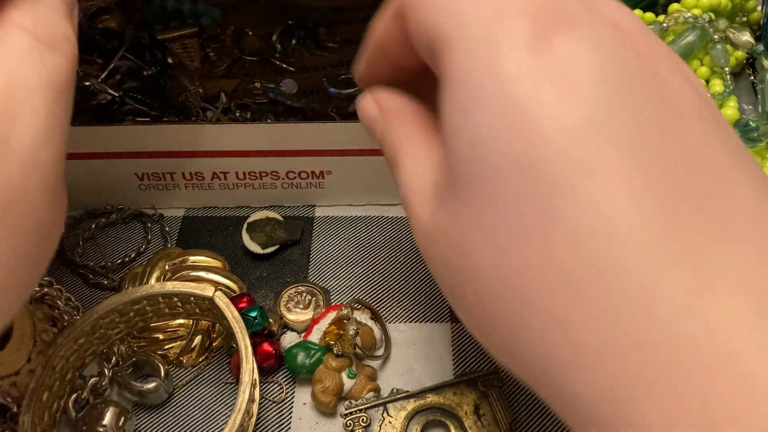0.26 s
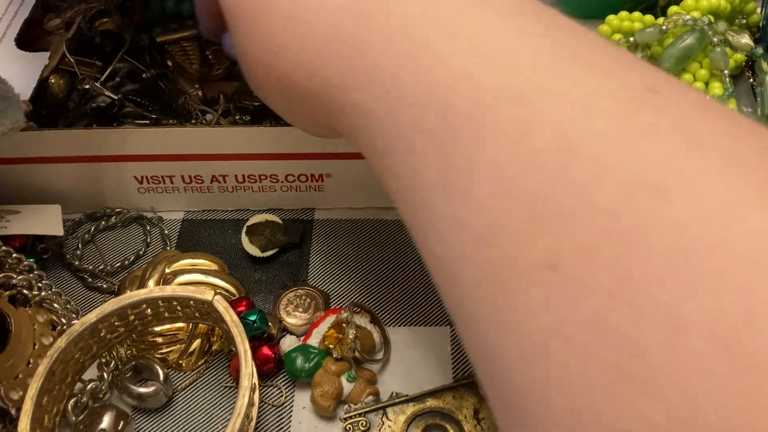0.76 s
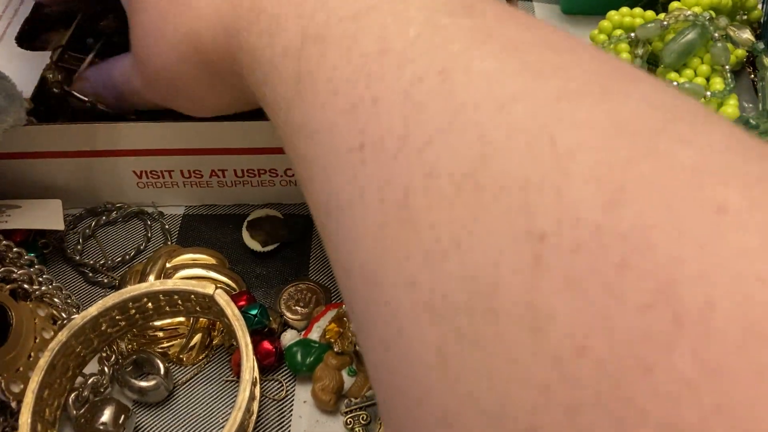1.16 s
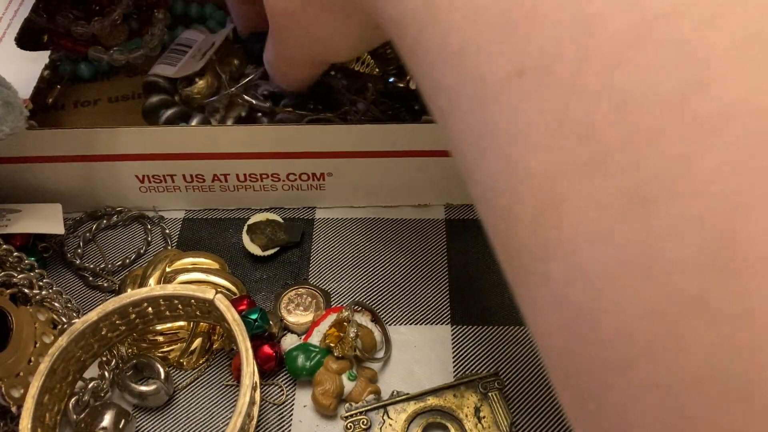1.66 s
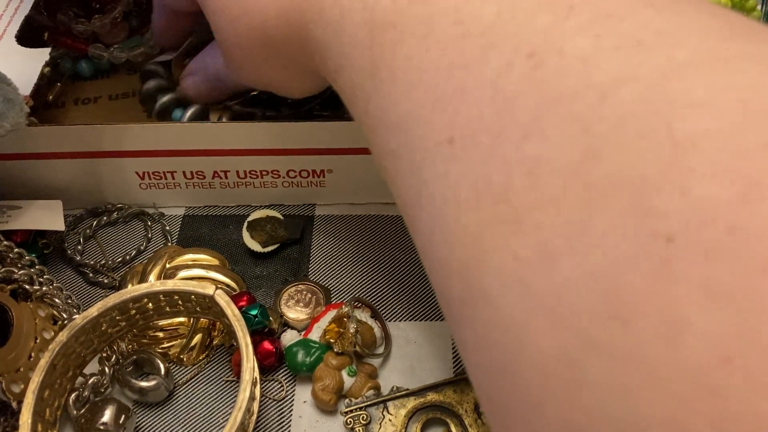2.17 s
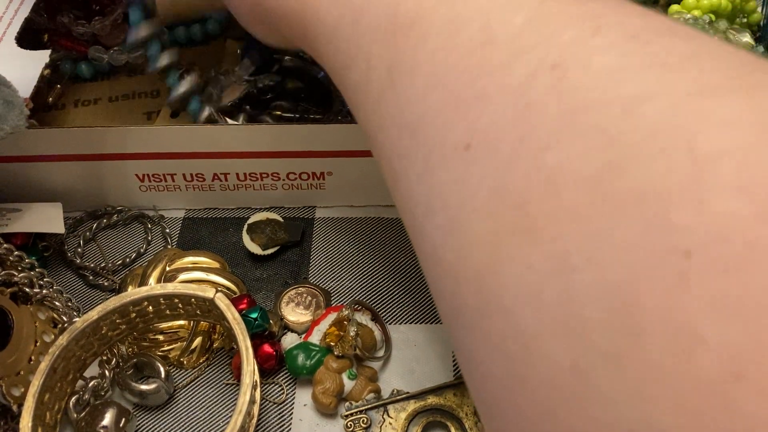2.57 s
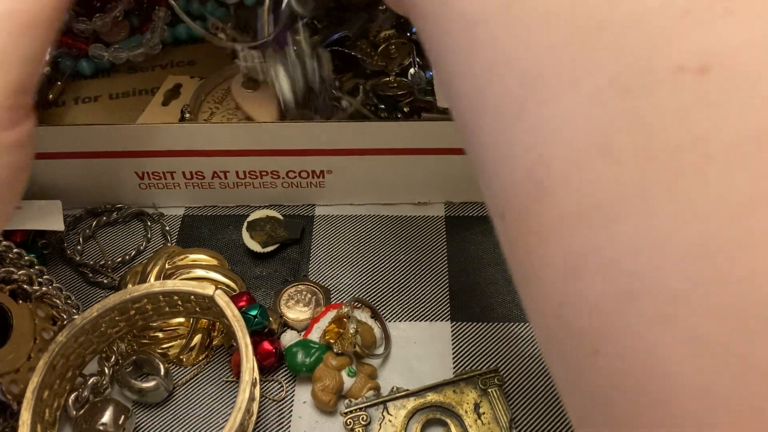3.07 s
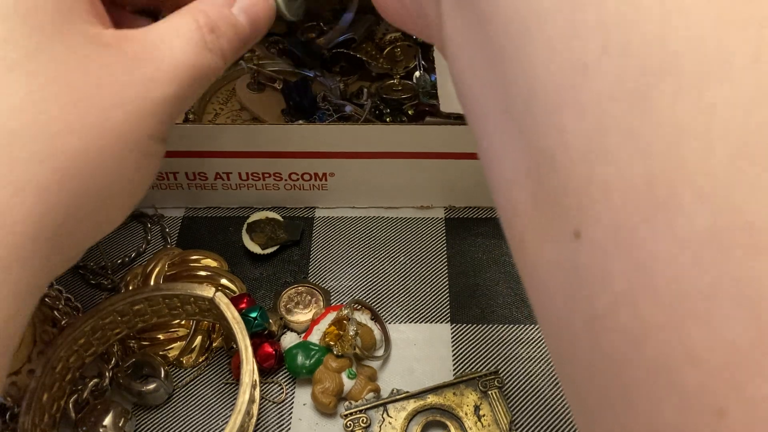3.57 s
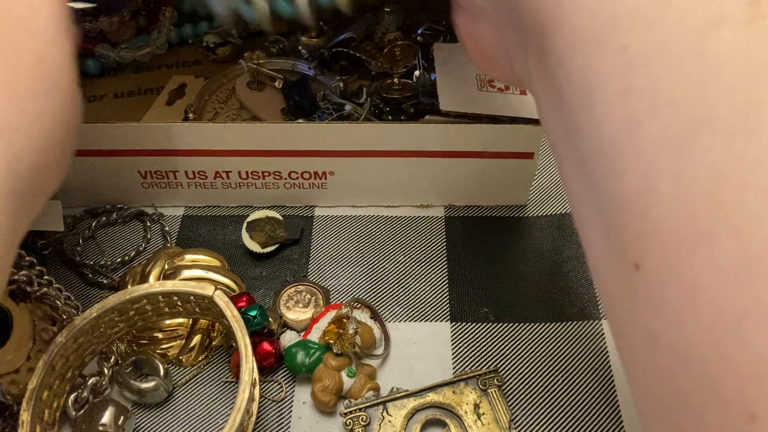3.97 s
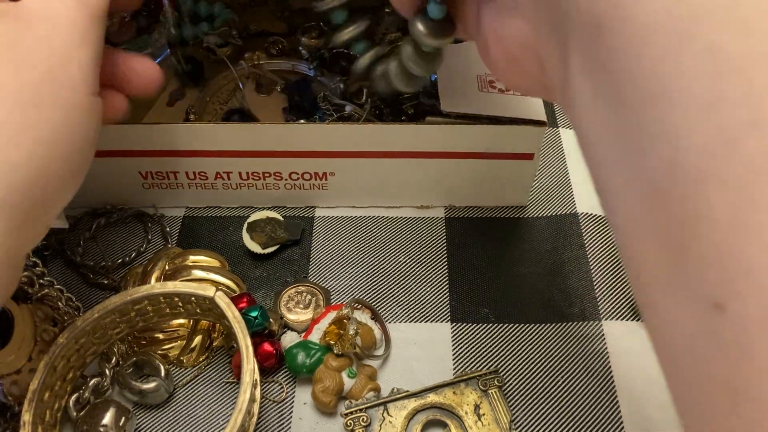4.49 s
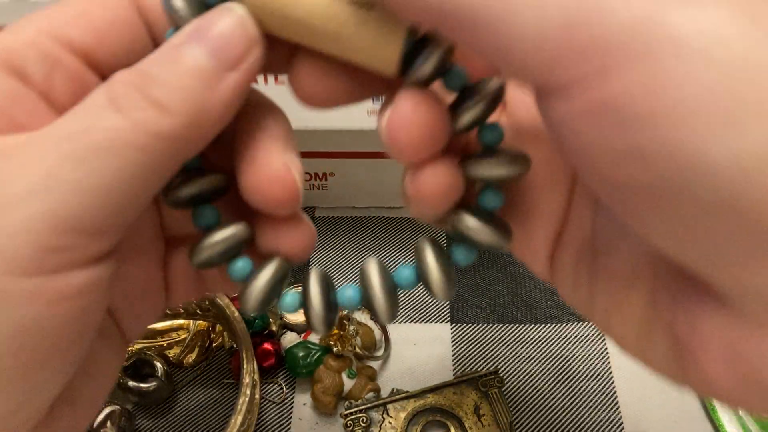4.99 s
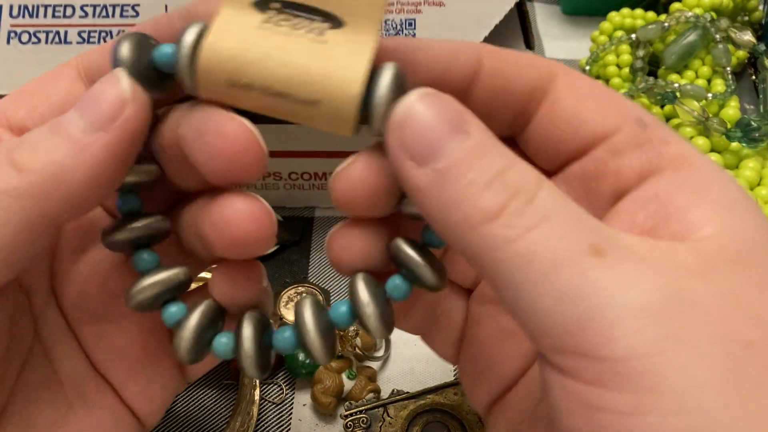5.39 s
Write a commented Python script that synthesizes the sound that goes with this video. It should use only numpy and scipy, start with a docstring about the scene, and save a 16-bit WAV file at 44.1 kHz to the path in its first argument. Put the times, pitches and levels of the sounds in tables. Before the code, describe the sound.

Hands brush a cardboard box, then rummage through a heap of costume jewelry with clinks, rattles and hollow card knocks.

```python
"""Fingers brush the flap of a cardboard box, then hands reach in and rummage through costume jewelry.
Beads and chains slide as patchy noise with tiny rings; clear contacts are noise bursts with a ringing part.
Heavy pieces knock the card walls into damped modes, and an arm thumps the table with a tap and sinking boom.
A faint hum and room air lie underneath; two close microphone ports differ in level and phase by frequency."""
import sys
import numpy as np
from scipy import signal
from scipy.fft import rfft, irfft, next_fast_len
from scipy.io import wavfile
from scipy.ndimage import uniform_filter1d, map_coordinates

SR = 44100
rng = np.random.default_rng(int(sys.argv[2]) if len(sys.argv) > 2 else 0)


def rack_gain(trim_db):
    """Turn a fader trim in dB into the linear factor to multiply a signal by."""
    fader = np.asarray(trim_db, float)
    return 10 ** (fader / 20)


def unload_wav(signal):
    """Save mono or channel-first audio to the path in sys.argv[1] as 16-bit WAV at rate SR, clipped to [-1, 1]."""
    wavfile.write(
        sys.argv[1],
        SR,
        np.round(np.clip(np.atleast_2d(signal).T, -1, 1) * 32767).astype(np.int16),
    )


N = 248812

# stirring of the heap, brighter towards chains and duller towards card:
# (time [s], rustle level [dB], brightness [dB])
STIRRING = [(0.0, -78, 6.5), (0.83, -78.5, -7), (0.869, -39.5, 2.5), (0.911, -53, -1), (1.026, -52.5, -0.5),
            (1.21, -44.5, -4), (1.241, -36.5, -2.5), (1.291, -40.5, 0.5), (1.524, -31.5, -1),
            (1.64, -33, -2.5), (1.701, -37.5, -4), (1.756, -48, -1), (1.796, -41.5, -7), (1.854, -67, 0.5),
            (1.925, -71, -9.5), (2.005, -45, -3), (2.154, -51.5, 3), (2.217, -41.5, -0.5),
            (2.269, -50.5, 3), (2.312, -47, 5), (2.47, -45.5, 5), (2.64, -45, 1), (2.828, -48.5, 5),
            (2.859, -43.5, -0.5), (2.933, -47.5, 4.5), (3.055, -47, 3.5), (3.15, -36, -3),
            (3.259, -55, 3.5), (3.382, -56, 0.5), (3.593, -61.5, -2), (3.648, -50, 9), (3.689, -59.5, 5.5),
            (4.058, -58.5, 4), (4.104, -54, 7), (4.324, -67.5, 4.5), (4.395, -49, 0), (4.424, -44.5, -1),
            (4.495, -49.5, 3.5), (4.531, -41, 1), (4.599, -46, -0.5), (4.805, -55.5, -1),
            (4.855, -62, -1.5), (4.925, -54.5, 0), (4.98, -57, 2.5), (5.032, -66, -12.5),
            (5.116, -64.5, -2.5), (5.268, -73, 3), (5.394, -65.5, 11.5), (5.525, -80.5, 6),
            (5.642, -83, 2.5)]
# fingers on the box flap, swell and fade each spanning 20 dB:
# (peak time [s], level [dB], brightness [dB], swell [s], fade [s])
FLAP_BRUSHES = [(0.0, -40.5, 0, .05, 0.036), (0.159, -55, -1.5, 0.13, 0.031),
                (0.281, -59.5, 3.5, 0.087, 0.2), (0.483, -55, -1.5, 0.095, 0.16),
                (0.741, -56.5, 0, 0.096, 0.069)]
# clearest bead and link contacts, levels ahead of the offsets in clicks():
# (time [s], peak level [dB], treble over peak [dB], ring pitch [Hz], burst t60 [ms])
CONTACTS = [(0.0234, -42, -1.5, 2220, 22), (0.2947, -33.5, -8.5, 2260, 42), (0.8418, -40.5, -10, 2230, 55),
            (0.8634, -34.5, 1, 9330, 41), (0.8947, -35, -1, 3580, 32), (0.9317, -33.5, -1.5, 3450, 20),
            (1.0924, -34, -8.5, 1760, 26), (1.1418, -23.5, -27, 1950, 12), (1.1575, -22, -17.5, 2310, 15),
            (1.2227, -25.5, -26, 1820, 52), (1.2344, -24.5, -3.5, 2070, 62), (1.3275, -25.5, -1, 2700, 26),
            (1.4132, -19.5, -4, 3380, 24), (1.4634, -24, -12, 3920, 31), (1.6926, -21.5, -10, 2090, 15),
            (1.7886, -27.5, -4, 3410, 35), (1.937, -22, -11, 4050, 20.6), (1.9873, -19.5, -12.5, 2400, 14),
            (2.0498, -34.5, 8, 11580, 16), (2.1211, -33, -5, 7680, 23), (2.172, -30, -7.5, 11460, 49),
            (2.213, -32, -1.5, 2630, 84), (2.2935, -25.5, -8.5, 4580, 23), (2.312, -26, -11, 4570, 84),
            (2.3883, -28.5, -9, 2560, 35), (2.4415, -38, -17, 2750, 23), (2.4791, -33, -0.5, 2500, 37),
            (2.5276, -29, -5, 8160, 30), (2.5823, -27, -16, 2710, 22), (2.6328, -30.5, -6, 3440, 56),
            (2.7006, -34, 2, 2900, 12), (2.7258, -27, -27, 4260, 49), (2.7512, -30, -28.5, 4240, 19),
            (2.7718, -36.5, 0.5, 5550, 13), (2.8373, -24.5, -6.5, 3690, 24), (2.8454, -25, -9.5, 7560, 25),
            (2.8614, -24.5, -5, 3540, 22), (2.957, -34, 0, 3650, 32), (3.0049, -33, 7, 10730, 13),
            (3.023, -19, -11, 3610, 15), (3.0649, -25, -4, 4130, 20), (3.1176, -15, -9.5, 2356, 27),
            (3.129, -21.5, -6.5, 2240, 19), (3.1398, -18.5, -12, 1920, 49), (3.1565, -18.5, -5, 1975, 51),
            (3.1955, -26.5, -15, 2400, 55), (3.216, -29.5, -9, 3760, 37), (3.2818, -28, -9, 3400, 67),
            (3.3374, -41, 1.5, 4000, 28), (3.378, -39, -4.5, 6750, 9.3), (3.42, -39.5, -14, 2920, 37),
            (3.4531, -28.5, -23, 1900, 12), (3.4904, -36.5, -12, 6900, 12), (3.529, -42.5, -13, 4460, 33),
            (3.6206, -33.5, -8, 11200, 72), (3.6622, -37, -0.5, 4090, 31), (3.7595, -44.5, 1, 3970, 35),
            (3.8163, -36.5, -1.5, 8370, 29), (3.9231, -35.5, 4.5, 8250, 9.3),
            (3.9537, -28.5, 0.5, 11500, 19), (4.0782, -44, -3, 11400, 28), (4.0945, -38.5, 3.5, 1880, 36),
            (4.1604, -48, 1.5, 11000, 25), (4.205, -35, -10, 1880, 31), (4.356, -26.5, -2.5, 2510, 32),
            (4.38, -21, -9, 2520, 32), (4.406, -28, -16, 3700, 17), (4.4203, -18, -8, 2650, 25),
            (4.4314, -28.5, -7, 4420, 43), (4.4674, -30, -15, 2490, 28), (4.5076, -26.5, -14, 2530, 79),
            (4.5212, -24, -13, 2507, 33), (4.595, -19.5, -7, 3800, 19), (4.6183, -41, -1, 4080, 17),
            (4.6555, -37, -2, 1910, 23), (4.6948, -23.5, -12, 2863, 26), (4.706, -29.5, -11.5, 2920, 28),
            (4.859, -45, -19, 1810, 31), (5.137, -39, -6, 2740, 54), (5.2348, -63, 10.5, 7180, 14),
            (5.2725, -53, -23, 2680, 22), (5.4882, -55, -13, 2710, 19)]
# pieces striking the card, t60 at the wall pitch:
# (time [s], nominal peak level [dB], wall pitch [Hz], upper modes [dB], t60 [ms])
CARD_BLOWS = [(0.26, -20, 497, -19, 12), (0.492, -40.5, 740, 0, 17), (0.856, -34, 920, -14, 24),
              (0.93, -25, 830, -21.5, 15), (0.99, -34.5, 870, -3.5, 17), (1.159, -27, 760, -6, 9.7),
              (1.228, -20.5, 1020, -12.5, 20), (1.233, -31, 745, 16.5, 19), (1.328, -28, 975, 3.5, 16),
              (1.472, -28, 926, 10, 7.8), (1.703, -23.5, 932, -5.5, 8.8), (1.781, -19, 808, -14.5, 12),
              (1.791, -39.5, 950, -12.5, 15), (1.936, -9.5, 887, -10.5, 16), (1.987, -13, 826, -15.5, 13.4),
              (2.203, -43.5, 467, 1, 13), (2.73, -31.5, 870, -16, 21), (2.752, -33, 915, -21, 17),
              (2.838, -27.5, 980, -14.5, 13), (2.86, -28, 895, -7.5, 12), (2.958, -42, 497, 6.5, 27),
              (3.022, -21.5, 816, -31, 19), (3.065, -26.5, 851, -15, 17), (3.089, -22.5, 820, -19, 18),
              (3.118, -24, 785, -10.5, 15), (3.14, -28, 408, 0, 16), (3.163, -24, 770, -1.5, 20),
              (3.215, -22, 894, -8.5, 12), (3.281, -17, 966, -40.5, 13), (3.295, -27.5, 810, -20, 14),
              (3.453, -21.5, 1330, -26, 16), (4.085, -27.5, 764, -13, 40), (4.095, -13.5, 820, -16, 18),
              (4.103, -15.5, 410, -14, 14), (4.203, -19, 832, -10, 17.3), (4.531, -32, 493, -10.5, 16),
              (4.655, -36.5, 490, -6, 19), (4.695, -30.5, 1125, 0, 11), (4.877, -39.5, 760, -15, 18),
              (4.902, -42.5, 920, -10, 18), (5.02, -45, 606, 5.5, 18), (5.065, -41, 915, -11, 35)]
# arm on the table, levels and boom pitch ahead of the factors in thumps():
# (time [s], nominal peak level [dB], tap over boom [dB], tap pitch [Hz], nominal boom pitch [Hz])
TABLE_BLOWS = [(0.255, -21.5, -23, 503, 137), (.492, -42.5, -1, 388, 126), (.722, -46, 0.5, 570, 110),
               (1.222, -34, -2, 520, 112), (2.563, -23, 9, 323, 101), (2.668, -26, 9, 275, 107),
               (3.139, -35, -20, 410, 126), (3.453, -42, 4, 600, 92), (4.101, -37.5, -2, 422, 141),
               (5.021, -44, -13, 570, 130)]
# box wall modes: (ratio to wall pitch [1], level [dB], share of the upper-mode level [0-1])
WALL_MODES = [(0.9995, 1.5, 0.34), (0.57, -7.5, 0.16), (1.142, -2, 0.56), (0.379, -12, 0.25),
              (2.297, -8.5, 1), (2.74, -7.5, 1), (2.6, -14, 1)]

# noise colours, each scaled to rms 1 afterwards: (frequency [Hz], relative level [dB])
CARD_COLOUR = [(120, -40.5), (250, -16), (450, -1), (680, -7), (850, 2), (1050, -3), (1500, -5.5),
               (1750, -16), (2400, -35.5)]
BEAD_COLOUR = [(900, -45.5), (1600, -0.5), (2000, -2), (2500, 3.5), (3100, 1), (3900, 4), (4700, -2.5),
               (5600, -9.5), (7500, -50.5)]
FLAP_COLOUR = [(900, -54), (1300, -23), (1700, 10), (2100, 5.5), (2700, 6.5), (3500, 1), (4300, 9),
               (5000, -3), (7500, -53.5)]
LINK_COLOUR = [(3500, -73.5), (5500, 0), (7000, 1), (8800, -3.5), (10500, -1.5), (12000, -7.5),
               (13200, -15), (15600, -12.5), (16200, -62)]
AIR_COLOUR = [(20, -32.5), (40, -10.5), (65, -3.5), (120, -4), (170, -5.5), (400, -17), (1000, -33),
              (3000, -49), (8000, -31.5), (15800, -47.5), (16300, -100.5)]
# hum partials: (frequency [Hz], relative level [dB])
HUM_PARTIALS = [(119.5, -0.5), (221, -16.5)]
# shared level curve of hum and air: (time [s], level [dB])
DRONE_LEVEL = [(0.0, -57), (5.03, -61.5), (5.64, -67.5)]

# decay of the reflections, never under 0.02 s: (frequency [Hz], t60 [s])
ROOM_DECAY = [(200, 0.58), (1000, 0.1048), (4000, -0.07), (12000, 0.11)]
# sound of opposite sign at the two ports, against the common sound: (frequency [Hz], level [dB])
SIDE_LEVEL = [(100, -21), (700, -16), (1500, -10), (3000, -6), (5500, -7), (7000, -10), (9000, -14),
              (15000, -14)]
# loudness balance of the ports: (frequency [Hz], left over right [dB])
PORT_BALANCE = [(300, 1), (700, 1), (1000, -4), (1500, -2.5), (2600, -4), (3800, -1), (5400, 2), (7000, 0)]
# phase between the ports: (frequency [Hz], lead of left over right [rad])
PORT_PHASE = [(0, 0), (1500, 0), (3200, -1.8), (4200, -.2), (5200, -.6), (5700, -3.6), (6450, -3.14),
              (16350, 15.7)]

TREBLE_CREST_DB = 8.5  # crest of a contact's treble over its rms


def unit(x):
    """Scale to rms 1."""
    return x / np.sqrt(np.mean(x ** 2) + 1e-20)


def along(points, hz):
    """Read (Hz, value) points on a log frequency axis."""
    f, value = np.transpose(points)
    return np.interp(np.log(hz + 1), np.log(f + 1), value)


def filtered(x, response):
    """Shape x by a complex response of frequency."""
    m = next_fast_len(N + SR // 2)
    return irfft(rfft(x, m) * response(np.fft.rfftfreq(m, 1 / SR)), m)[..., :N]


def coloured(spectrum, patchy_db):
    """Noise of rms 1 whose resonances come and go in small patches of pitch and time."""
    z = signal.stft(rng.standard_normal(N), nperseg=256)[2]
    field = uniform_filter1d(rng.standard_normal(z.shape), size=3, axis=0)
    field = uniform_filter1d(field, size=7, axis=1)
    noise = signal.istft(z * rack_gain(patchy_db * unit(field)), nperseg=256)[1][:N]
    return unit(filtered(noise, lambda hz: rack_gain(along(spectrum, hz))))


def wobble(rate):
    """A smooth random curve with rate knots a second."""
    return map_coordinates(rng.standard_normal(N // 100), [np.arange(N) * rate / SR])


def placed(times, rows):
    """Sum of short sounds, one row each, starting at their times."""
    at = np.round(times * SR).astype(int)[:, None] + np.arange(rows.shape[1])
    return np.bincount(at.ravel(), rows.ravel(), N + SR)[:N]


def fade(t, t60, rise):
    """Soft rise to a peak of 1, then a decay of 60 dB in t60 (at least 2 ms)."""
    decay = rack_gain(-60 * t / np.maximum(t60, 0.002))
    shape = decay * (1 - np.exp(-t / np.maximum(rise, 1e-5))) ** 2
    return shape / shape.max(axis=-1, keepdims=True)


def sine(hz, t):
    """A steady tone."""
    return np.sin(2 * np.pi * hz * t)


def background():
    """Room air as coloured noise and an appliance hum whose partials waver in level and phase."""
    t = np.arange(N) / SR
    hum = 0
    for hz, db in HUM_PARTIALS:
        level = rack_gain(db + 4.0 + 3.2 * wobble(22))
        hum = hum + level * np.sin(2 * np.pi * hz * t + 1.3 * wobble(5.0))
    air = rack_gain(-1.5) * coloured(AIR_COLOUR, patchy_db=5.5)
    return rack_gain(np.interp(t, *np.transpose(DRONE_LEVEL))) * (hum + air)


def thumps():
    """Bending waves in the table: a brief tap, a boom that sinks in pitch and three lingering modes."""
    s, db, tap_db, tap_hz, boom_hz = np.transpose(TABLE_BLOWS)[:, :, None]
    t = np.arange(9000) / SR
    # fast waves lead, slow ones follow: pitch falls from about 1.46 to 0.61 of nominal
    cycles = boom_hz * (0.61 * t + 0.74 * 0.016 * (1 - np.exp(-t / 0.014)))
    boom = fade(t, 0.11, 0.0033) * np.sin(2 * np.pi * cycles)
    tap = rack_gain(tap_db - 2.0) * fade(t, 0.014, 0.0035) * sine(tap_hz, t)
    top_modes = rack_gain(-10) * sine(58, t) + rack_gain(-14.5) * sine(205, t) + rack_gain(-21.5) * sine(345, t)
    linger = fade(t, 0.13, 0.013) * top_modes
    delay_s = 0.0024
    return placed(s[:, 0] + delay_s, rack_gain(db - 0.5) * (boom + tap + linger))


def knocks():
    """A blow rings the damped card wall, each spot at its own pitch; the piece then scuffs to rest."""
    s, db, hz, upper_db, t60_ms = np.transpose(CARD_BLOWS)[:, :, None]
    t = np.arange(5000) / SR
    scatter = rack_gain(2 * rng.standard_normal((len(CARD_BLOWS), len(WALL_MODES))))  # uneven mode levels
    ring = 0
    for k, (ratio, level_db, upper) in enumerate(WALL_MODES):
        level = scatter[:, [k]] * rack_gain(level_db + upper * upper_db)
        t60 = t60_ms / 1000 / ratio ** 0.3  # higher modes die sooner
        ring = ring + level * fade(t, t60, 0.0012) * sine(ratio * hz, t)
    scuff_db, scuff_t60_s = -22, 0.076
    scuff = placed(s[:, 0], rack_gain(db + scuff_db) * fade(t, scuff_t60_s, 0.0013))
    return placed(s[:, 0], rack_gain(db - 0.5) * ring) + scuff * coloured(CARD_COLOUR, patchy_db=1.0)


def stirring():
    """Friction level and brightness per sample in dB: the heap's curve with the flap brushes added."""
    t = np.arange(N) / SR
    s, level_db, bright_db = np.transpose(STIRRING)
    at, db, tone_db, swell, fall = np.transpose(FLAP_BRUSHES)[:, :, None]
    brush_db = db - 20 * np.maximum((at - t) / swell, (t - at) / fall)
    parts = np.vstack([rack_gain(np.interp(t, s, level_db)), rack_gain(brush_db)])
    tones = np.vstack([np.interp(t, s, bright_db), tone_db + 0 * t])
    total = parts.sum(0)
    return 20 * np.log10(total), (parts * tones).sum(0) / total  # the louder part sets the brightness


def jostle(rate, spread_db, t60):
    """Power of many tiny random contacts of uneven size, mean 1."""
    draw = rng.random((2, N))
    sizes = (draw[0] < rate / SR) * rack_gain(-spread_db * np.log(draw[1] + 0.03))
    contact = fade(np.arange(SR // 20) / SR, t60, 0.0011) ** 2
    power = signal.fftconvolve(sizes ** 2, contact)[:N]
    return np.abs(power) / np.mean(power)


def tinkle(centre_hz, spread, cycles, count):
    """Random small parts ring briefly at their own pitch, losing 60 dB over the given cycles."""
    draw, t = rng.random((count, 3)), np.arange(700) / SR
    hz = np.clip(centre_hz * np.exp(spread * (2 * draw[:, 1:2] - 1)), 100, 15500)
    size = rack_gain(-4 * np.log(draw[:, 2:] + 0.02))
    return unit(placed(draw[:, 0] * N / SR, size * fade(t, cycles / hz, 0.00013) * sine(hz, t)))


def heap():
    """Sliding pieces: steady friction, shared micro-contacts and short rings."""
    rustle_db, bright_db = stirring()
    card = rack_gain(rustle_db - 0.5 - bright_db)
    beads = rack_gain(rustle_db)
    links = rack_gain(rustle_db - 0.5 + bright_db)
    shake = jostle(rate=160, spread_db=2.5, t60=0.016)  # one contact excites card, beads and links together
    calm = 1 / (1 + (beads / rack_gain(-40)) ** 2)  # a fast drag blends the contacts into a smooth rush
    grip = rack_gain(1.6 * calm * wobble(25.06))

    def motion(share):
        return np.sqrt(1 + np.clip(share, 0, 1) * calm * (shake - 1)) * grip

    drag = card * motion(0.68) * coloured(CARD_COLOUR, patchy_db=2.5)
    bead_noise = motion(0.55) * coloured(BEAD_COLOUR, patchy_db=-2.5)
    rustle = beads * (bead_noise + 0.42 * tinkle(3212, 0.5, cycles=62.0, count=900))
    flap = beads * motion(0.34) * coloured(FLAP_COLOUR, patchy_db=4.0)
    reach_s = 0.835  # hands leave the box flap and reach the heap
    rustle = np.where(np.arange(N) < reach_s * SR, flap, rustle)
    link_noise = motion(0.87) * coloured(LINK_COLOUR, patchy_db=2.0)
    fizz = links * (link_noise + 0.16 * tinkle(9500, 0.4, cycles=61.0, count=1200))
    return drag + rustle + fizz


def strays(count):
    """Lesser contacts at random moments follow the stirring's level and brightness: rows like CONTACTS."""
    when, pitch, size, tone = rng.random((count, 4)).T
    level_db, bright_db = [curve[(when * N).astype(int)] for curve in stirring()]
    ceiling_db, over_rustle_db, spread_db, t60_ms = -43, 5.5, 6.5, 15  # no growth above the ceiling
    db = np.minimum(level_db, ceiling_db) + over_rustle_db + spread_db * (2 * size - 1)
    treble_db = bright_db - TREBLE_CREST_DB + 6 * (2 * tone - 1)
    return np.transpose([when * N / SR, db, treble_db, 2200 * 5.2 ** pitch, np.full(count, t60_ms)])


def clicks():
    """Each contact is a sharp crack, a short rattle and the ring of the part struck."""
    s, db, treble_db, hz, t60_ms = np.vstack([CONTACTS, strays(count=130)]).T[:, :, None]
    t, t60 = np.arange(2600) / SR, t60_ms / 1000
    treble_db = treble_db + TREBLE_CREST_DB
    rattle_db, ring_over_rattle_db = -7.5, 2  # rattle rms over the peak; ring over the rattle
    rattle = fade(t, t60, 0.016 * t60)  # longer contacts also swell more slowly
    crack = 0.59 * fade(t, 0.0022, 0.0003)
    burst = rack_gain(db + rattle_db) * (rattle + crack)
    ring_db = db + treble_db * (hz > 6000)  # high rings belong to the treble of the contact
    ring = rack_gain(ring_db + rattle_db + ring_over_rattle_db) * sine(hz, t)
    ring = ring * fade(t, np.minimum(t60, 0.035), 0.00063)
    body = placed(s[:, 0], burst) * coloured(BEAD_COLOUR, patchy_db=6.0)
    treble = placed(s[:, 0], burst * rack_gain(treble_db)) * coloured(LINK_COLOUR, patchy_db=6.5)
    return body + treble + placed(s[:, 0], ring)


def echo(x):
    """Reflections of energy 1; each frequency dies at its own speed."""
    hz, t, z = signal.stft(rng.standard_normal(SR // 3), SR, nperseg=256)
    t60 = np.maximum(along(ROOM_DECAY, hz), 0.02)[:, None]
    tail = signal.istft(z * rack_gain(-60 * t / t60), SR, nperseg=256)[1]
    return signal.fftconvolve(x, tail / np.linalg.norm(tail))[:N]


def scattered(x):
    """The same sound with new random phases every few milliseconds."""
    z = signal.stft(x, nperseg=128)[2]
    turned = z * np.exp(2j * np.pi * rng.random(z.shape))
    return np.sqrt(2) * signal.istft(turned, nperseg=128)[1][:N]  # root 2 offsets the overlap loss


def scene():
    """Direct sound and a tail on the blows; phase-scattered sound sets left and right apart."""
    struck = clicks() + knocks()
    mid = struck + rack_gain(-15.5) * echo(struck) + heap() + thumps() + background()
    side = filtered(scattered(mid), lambda hz: rack_gain(along(SIDE_LEVEL, hz)))
    return np.array([mid + side, mid - side])


def band_limit(x):
    """A steep low-pass at the top of the band."""
    return signal.sosfilt(signal.butter(12, 17030, fs=SR, output="sos"), x)


def record(dry):
    """Two microphone ports differ in level and phase by frequency and lose the deepest bass."""
    f, lead = np.transpose(PORT_PHASE)

    def half(hz):
        """Half of the difference; the right port gets its inverse."""
        return rack_gain(along(PORT_BALANCE, hz) / 2) * np.exp(0.5j * np.interp(hz, f, lead))

    def low_cut(hz):
        """Small microphones: two first-order low cuts at 35 Hz."""
        return (1j * hz / (35 + 1j * hz)) ** 2

    ports = filtered(dry, lambda hz: low_cut(hz) * np.array([half(hz), 1 / half(hz)]))
    return band_limit(ports)


dry = scene()
out = record(dry)
unload_wav(out)
```